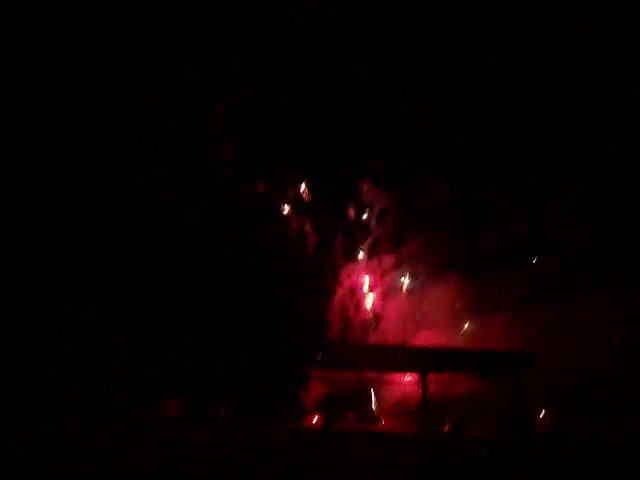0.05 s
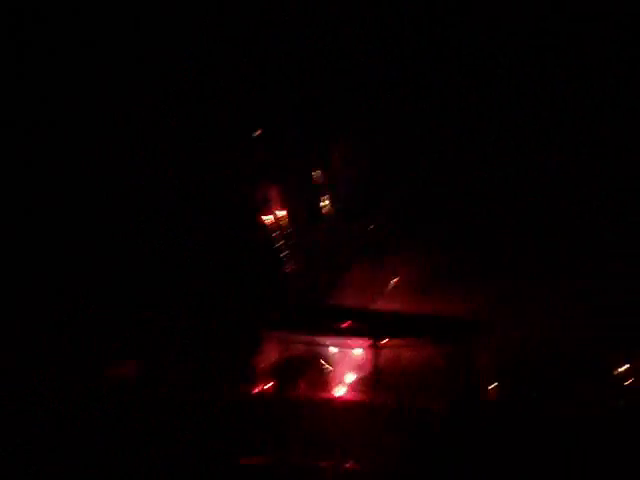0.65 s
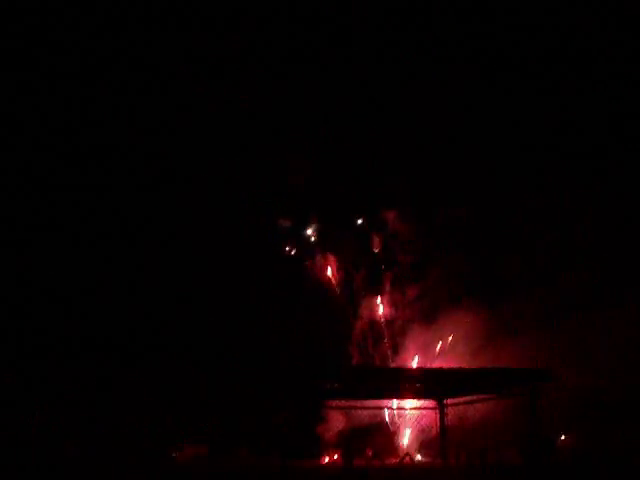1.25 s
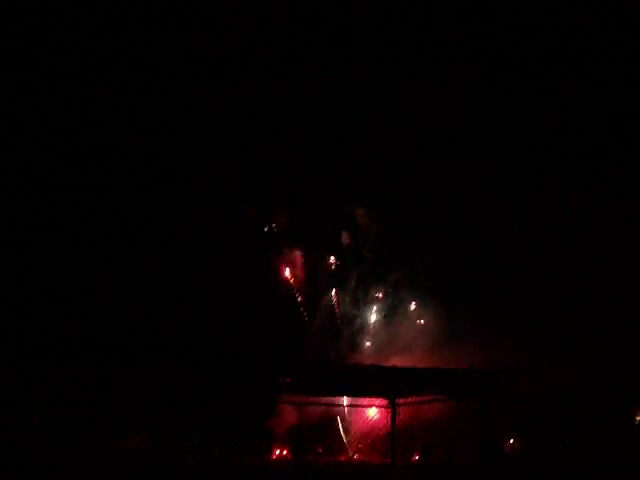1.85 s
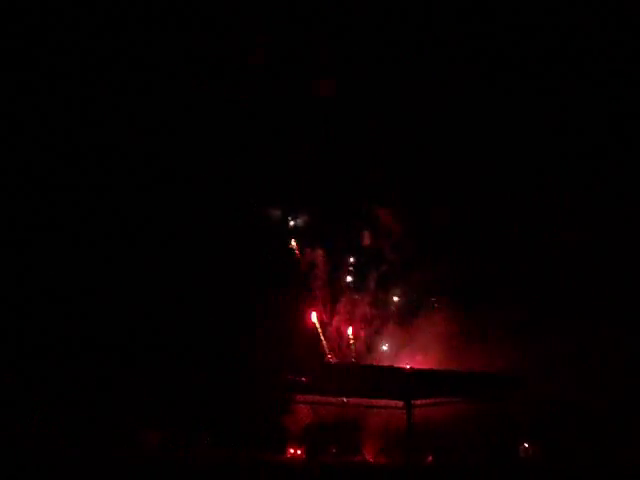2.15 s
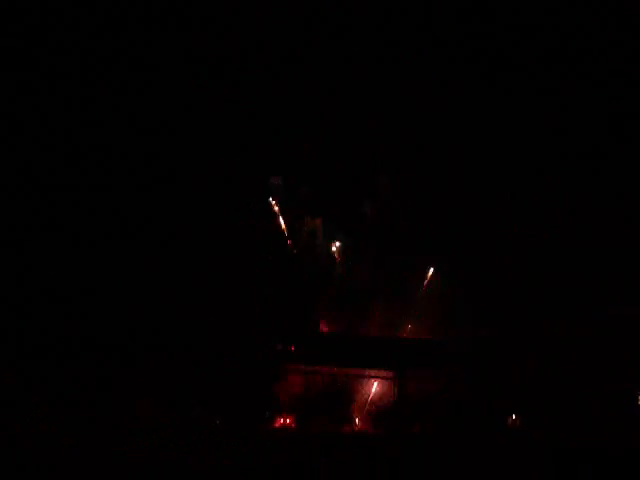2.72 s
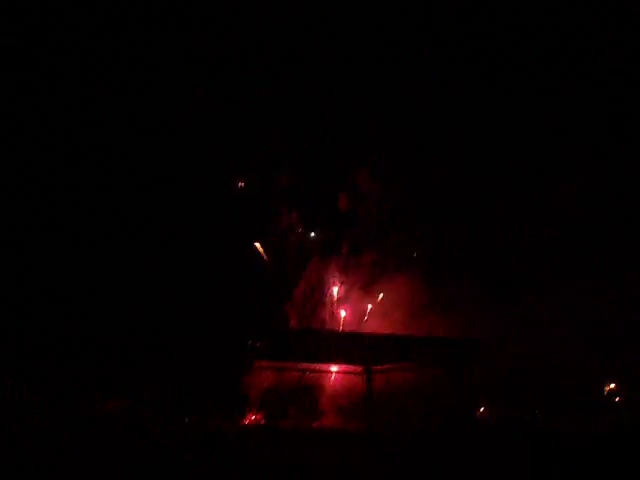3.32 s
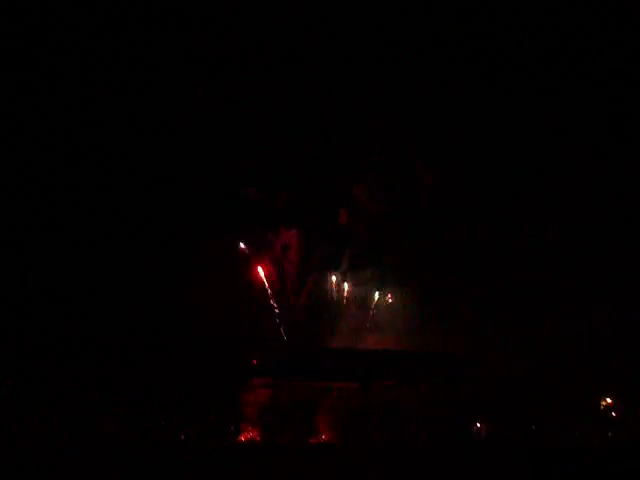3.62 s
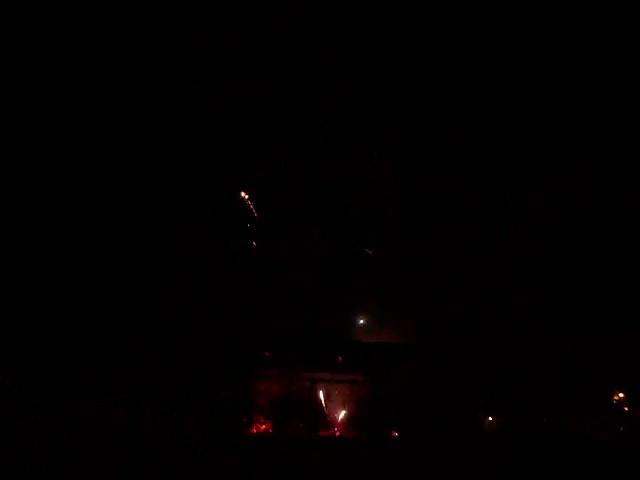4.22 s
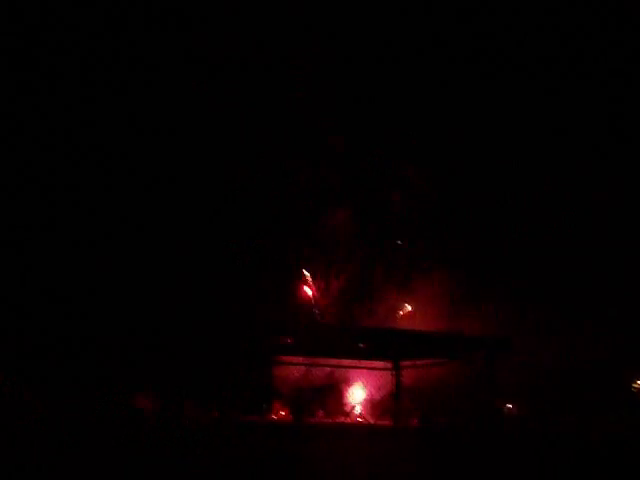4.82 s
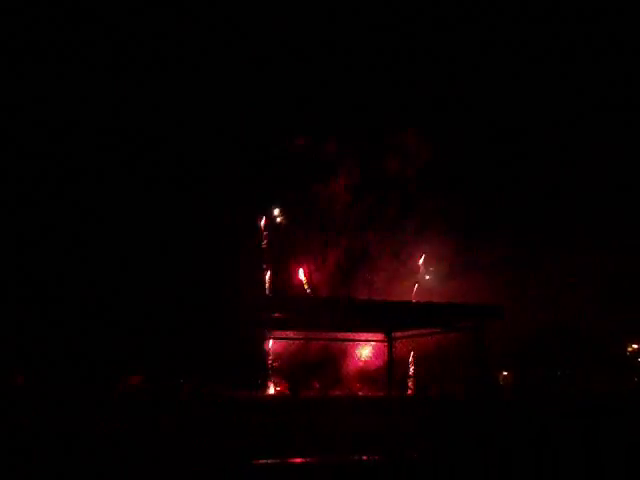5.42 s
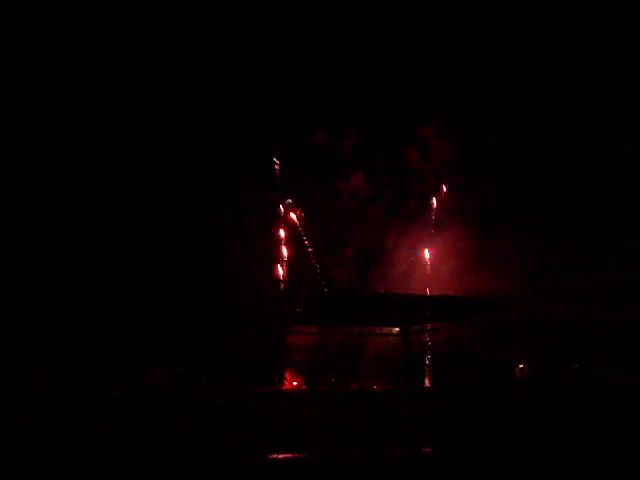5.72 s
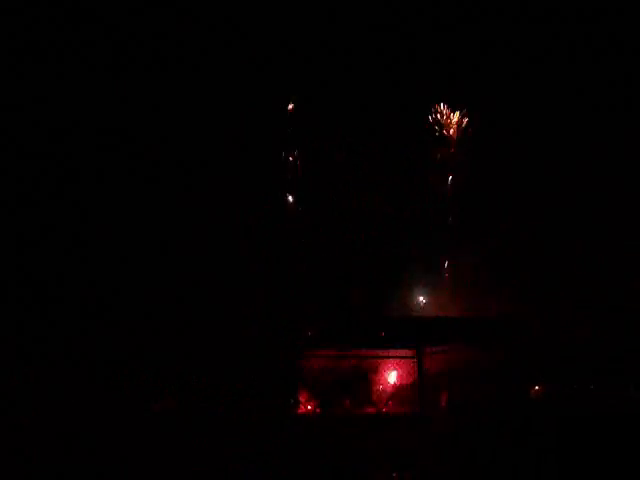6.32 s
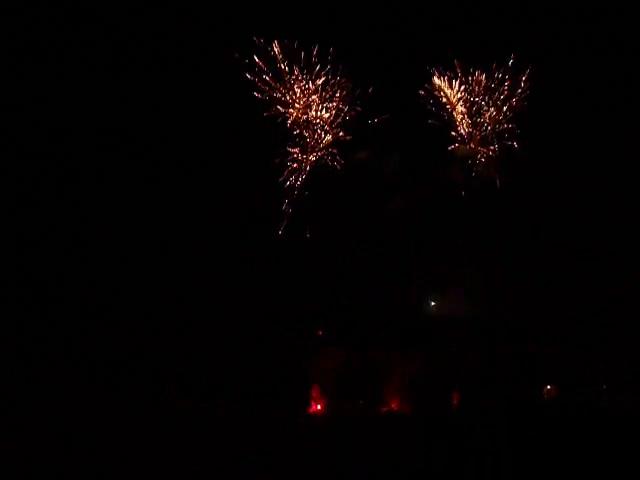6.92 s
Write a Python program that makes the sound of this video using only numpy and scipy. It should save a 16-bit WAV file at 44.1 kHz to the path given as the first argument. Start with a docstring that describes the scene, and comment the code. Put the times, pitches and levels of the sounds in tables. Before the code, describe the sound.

Ground fireworks crackle and pop continuously some way off outdoors, with a light echo over soft night noise. Faint gliding whistles sound between 0.3 and 1 second and again at 1.5 seconds. Close up, fingers rub the hand-held camera during the first second and a half, and wind buffets the microphone around 0.3 seconds, hardest at 1 second, and again at 2.5. A cluster of loud knocks on the camera follows from 2.6 to 2.8 seconds, then a few small thuds, the strongest near 3.4. A faint low hum returns about once a second from 1.2 seconds on. From 5.4 to 6.2 seconds, comets leave their tubes in a quick run of sharp cracks with light thumps. At about 6.7 seconds they burst in several loud bangs and dense crackling. The loudest moments overload the microphone.

```python
"""Ground fireworks at night

Some way off, stars (burning pellets) crackle without pause, and a few whistles sound among them.
Comets are shot from tubes with sharp cracks, then burst into dense crackling. Close by, a hand-held
camera is rubbed and knocked, air buffets its microphone, and a low hum comes about once a second.
The loudest moments overload the microphone."""
import sys
import numpy as np
from scipy import signal
from scipy.io import wavfile
from scipy.ndimage import uniform_filter1d

SR = 44100
rng = np.random.default_rng(int(sys.argv[2]) if len(sys.argv) > 2 else 0)


def dump(signal):
    """Clip the signal to [-1, 1] and save it as 16-bit WAV at the path in sys.argv[1]."""
    limited = np.clip(np.atleast_2d(signal).T, -1, 1)
    pcm = np.round(limited * 32767).astype(np.int16)
    wavfile.write(sys.argv[1], SR, pcm)


N = 306495
TIME = np.arange(N) / SR

# The tone of a sharp snap. Each row: frequency in Hz, relative level in dB.
SNAP_COLOUR = [(410, -54.5), (700, -18), (741, -22), (964, -8.5), (1250, -19.5), (1400, -12.5), (1590, -15),
               (2120, -2.5), (2560, -3.5), (3070, -1), (3420, -4), (3840, -1), (4990, -12.5), (6490, -40.5),
               (11000, -120)]
# How fiercely the stars burn. Each row: time in seconds, relative level of their crackle in dB.
FIERCENESS = [(0, -29.5), (.29, -23.5), (.84, -26), (1.42, -31.5), (1.68, -22.5), (2.62, -22.5),
              (2.83, -31), (3.36, -22.5), (3.9, -33.5), (4.3, -25), (4.55, -24.5), (5.3, -38.5), (5.5, -34),
              (5.62, -27.5), (5.88, -23.5), (6.45, -30.5), (6.95, -26)]


def amp(db):
    """Turns decibels into a number to multiply a sound by."""
    return 10 ** (np.asarray(db) / 20)


def unit(x):
    """Scales a signal so that its average strength (rms) is 1."""
    return x / np.sqrt(np.mean(x ** 2) + 1e-20)


def add(mix, s, sound):
    """Mixes a sound in, starting at s seconds."""
    part = mix[max(round(s * SR), 0):][:len(sound)]
    part += sound[:len(part)]


def colour(x, points, size=4096):
    """Shapes a sound's tone to follow (Hz, dB) points; white noise keeps its power."""
    hz, db = np.transpose(points)
    bin_hz = abs(np.fft.fftfreq(size, 1 / SR))
    curve_db = np.interp(np.log(bin_hz + 1), np.log(hz + 1), db)
    log_gain = np.log(amp(np.maximum(curve_db, -90)))
    response = np.exp(np.conj(signal.hilbert(log_gain)))  # rings after a click, never before it
    taps = np.fft.ifft(response).real[:size // 2]
    return signal.oaconvolve(x, taps / np.linalg.norm(taps))[:len(x)]


def snaps(count, per_s, spread_db):
    """Random clicks of uneven size, spread over count samples."""
    happens = rng.random(count) < per_s / SR
    size = np.minimum(rng.exponential(1, count), 4)
    sign = rng.choice([-1, 1], count)
    return unit(happens * sign * amp(spread_db * size))


def wobble(count, size):
    """A random drift; a larger size makes it slower."""
    return unit(uniform_filter1d(rng.standard_normal(count), size=size))


def swell(s, length, rise_s, fade_db_per_s):
    """A loudness curve that reaches 1 at s seconds, holds for the length, then fades."""
    rise = np.clip(1 + (TIME - s) / rise_s, 0, 1)
    return rise * amp(-fade_db_per_s * np.maximum(TIME - s - length, 0))


def field_echo(x, echo_db, fade_s):
    """Ground, shelter and trees scatter a sound, adding an echo that falls 60 dB in fade_s."""
    t = np.arange(SR) / SR
    reflections = snaps(SR, 2500, 4.5) * amp(-60 * t / fade_s) * (t > .012)
    tail = unit(reflections) / np.sqrt(SR)
    return x + amp(echo_db) * signal.fftconvolve(x, tail)[:N]


def night(level_db=-36):
    """The steady, soft noise of the outdoors."""
    # The tone of the background. Each row: frequency in Hz, relative level in dB.
    night_colour = [(29, -28.5), (50, -0.5), (153, -1), (727, -8.5), (934, -8), (1250, -8), (1400, -4.5),
                    (1660, -10), (2310, -1), (2910, -13.5), (3460, -5.5), (3810, -11), (4990, -14),
                    (6490, -37), (11000, -120)]
    return amp(level_db) * colour(rng.standard_normal(N), night_colour)


def hums(start_hz=163.5, sag=0.12, waver=0.069, tone_db=-7, rough_db=-2):
    """A low tone swells and sinks in pitch inside a rough drone."""
    # The hums. Each row: start in seconds, length in seconds, relative level in dB.
    hum_times = [(1.17, 0.26, -33), (2.21, 0.075, -32), (3.23, .24, -31.5), (4.26, .24, -31.5),
                 (5.18, 0.22, -32), (6.21, .24, -32.5)]
    # The tone of the drone. Each row: frequency in Hz, relative level in dB.
    drone_colour = [(50, -37.5), (100, -5.5), (135, 3.5), (180, -4), (240, -14.5), (400, -15), (900, -49.5)]
    out, drone = np.zeros(N), colour(rng.standard_normal(N), drone_colour)
    for s, length, db in hum_times:
        progress = np.linspace(0, 1, int(length * SR))
        count = len(progress)
        pitch = start_hz * (1 - sag * np.sqrt(progress) + waver * wobble(count, size=400))
        tone = amp(tone_db) * unit(np.sin(2 * np.pi * np.cumsum(pitch) / SR))
        rough = amp(rough_db) * unit(drone[round(s * SR):][:count])
        add(out, s, amp(db) * (tone + rough) * signal.windows.tukey(count, .3))
    return out


def wind(rumble_db=-5, flutter_db=-1):
    """Puffs jolt the microphone's thin skin, which creeps back; gusts rumble and flutter."""
    # Puffs of air. Each row: start in seconds, level in dB, push (+1) or pull (-1),
    # rise time in seconds, decay time in seconds.
    puffs = [(.2520, -1, 1, 0.0037, 0.0092), (0.294, -9, -1, 0.0039, 0.036),
             (0.345, -5.5, -1, 0.0024, 0.019), (0.376, -2, 1, 0.0071, 0.0021),
             (0.4056, -8.5, -1, 0.002, 0.023), (1.0332, 11, -1, 0.0011, 0.0031),
             (1.0379, 2.5, 1, 0.0009, 0.014), (1.0700, 3.5, -1, 0.0055, 0.0054),
             (1.0811, 3, 1, 0.0019, 0.024), (1.1130, -2.5, 1, 0.002, 0.012), (1.139, -12, -1, .025, 0.087),
             (1.7300, -17.5, 1, 0.0031, 0.0064), (2.464, -6.5, -1, 0.045, 0.0068),
             (2.513, 2, 1, 0.0013, 0.012), (2.9400, -16, 1, 0.017, 0.013), (3.0200, -17, -1, 0.021, 0.034)]
    # Gusts. Each row: arrival and length in seconds, relative levels of rumble and flutter in dB.
    gusts = [(0.261, 0.22, -19.5, -27.5), (1.021, 0.051, -19, -18), (1.72, 0.18, -23.5, -57),
             (2.198, 0.22, -26, -48), (2.424, .06, -20, -30), (2.496, 0.347, -32, -25.5),
             (2.955, 0.11, -23, -35), (4.15, 0.41, -29.5, -52), (4.623, 0.013, -23, -36),
             (5.1, 0.94, -31, -55)]
    # The tones of the rumble and of the swirling air. Each row: frequency in Hz, relative level in dB.
    rumble_colour = [(5, -1.5), (15, 0), (30, -8.5), (60, -17), (120, -27), (300, -54.5)]
    flutter_colour = [(20, 1.5), (60, -2.5), (150, 0.5), (280, -10), (500, -20.5), (1200, -46),
                      (3000, -92.5)]
    jolts, t = np.zeros(N), np.arange(SR // 2) / SR
    for s, db, direction, rise, decay in puffs:
        push = np.sin(np.pi / 2 * np.minimum(t / rise, 1)) ** 2
        creep_back = np.exp(-np.maximum(t - rise, 0) / decay)
        add(jolts, s, np.sign(direction) * amp(db) * push * creep_back)
    slow, quick = amp(-33), 0  # a breeze keeps rumbling between gusts
    for s, length, low_db, rough_db in gusts:
        slow = np.maximum(slow, amp(low_db) * swell(s, length, rise_s=.07, fade_db_per_s=24))
        quick = np.maximum(quick, amp(rough_db) * swell(s, length, rise_s=.02, fade_db_per_s=301))
    rumble = unit(colour(rng.standard_normal(N), rumble_colour + [(1000, -84)], size=16384))
    flutter = colour(rng.standard_normal(N), flutter_colour)
    return jolts + amp(flutter_db) * quick * flutter + amp(rumble_db) * slow * rumble


def knocks(detune=0.063, tick_db=-12, tick_s=0.0026):
    """Each knock ticks and makes the camera's case ring briefly, at slightly different pitches."""
    # Knocks on the camera. Each row: start in seconds, relative level in dB.
    blows = [(1.1750, -10), (2.5583, -8), (2.5847, -3.5), (2.611, 1.5), (2.639, 14), (2.641, 18.5),
             (2.6465, 1), (2.6847, 11.5), (2.6882, 6.5), (2.7561, 10.5), (2.7804, 10.5), (2.82, 9)]
    # The notes of the case. Each row: pitch in Hz, relative level in dB, seconds to fade by 60 dB.
    case_notes = [(64, -15.5, 0.048), (121.4, -22.5, 0.067), (177, -15, 0.06), (267.5, -10.5, 0.026),
                  (569, -8, 0.017), (947, -1.5, 0.022), (1112, 4.5, 0.01), (1396, 0, 0.0092),
                  (1365, -36.5, 0.18)]
    out, t = np.zeros(N), np.arange(SR // 4) / SR
    ring_s = np.array(case_notes)[:, 2]
    soft_start = 1 - np.exp(-t / 0.0006)
    for s, db in blows:
        # The shortest notes stray the most in pitch.
        tunings = 1 + detune * ring_s.min() / ring_s * rng.standard_normal(len(case_notes))
        ring = sum(amp(note_db - 60 * t / fade_s) * np.sin(2 * np.pi * hz * tuning * t)
                   for (hz, note_db, fade_s), tuning in zip(case_notes, tunings))
        tick = amp(tick_db) * np.exp(-t / tick_s) * colour(rng.standard_normal(len(t)), SNAP_COLOUR)
        add(out, s, amp(db) * (ring + tick) * soft_start)
    return out


def rubbing():
    """A finger sliding over the camera makes a stream of tiny slips."""
    # Finger strokes. Each row: arrival in seconds, length in seconds, level in dB.
    strokes = [(0.078, .042, -19), (0.183, 0.015, -20), (0.225, 0.025, -19), (0.625, 0.037, -28),
               (1.018, 0.094, -25), (1.181, 0.053, -22), (1.258, 0.084, -25), (2.499, .04, -25.5)]
    # The tone of the rubbing. Each row: frequency in Hz, relative level in dB.
    rub_colour = [(300, -19.5), (650, -16), (850, -4.5), (1050, 0.5), (1350, -7), (1900, -9.5), (2400, -10),
                  (4000, -44)]
    loudness = sum(amp(db) * swell(s, length, rise_s=0.022, fade_db_per_s=899)
                   for s, length, db in strokes)
    return loudness * colour(snaps(N, 3000, 3.3), rub_colour + [(6000, -66)])


def thuds(cycles=17, soft_s=0.0008, low_share=0.11):
    """Small dull thuds: a note that starts softly and dies fast, over a weaker one an octave below."""
    # The thuds. Each row: start in seconds, relative level in dB, pitch in Hz.
    hits = [(.4500, -17, 504), (2.0730, -18.5, 573), (3.1267, -12, 1130), (3.174, -14, 1020),
            (3.3673, 3, 1174)]
    out, t = np.zeros(N), np.arange(4000) / SR
    for s, db, hz in hits:
        ring = np.sin(2 * np.pi * hz * t) + low_share * np.sin(np.pi * hz * t)
        add(out, s, amp(db - 60 * t * hz / cycles) * (1 - np.exp(-t / soft_s)) * ring)
    return out


def whistles(arch=.012, waver=0.013, flutter=0.5, gain_db=-2):
    """A whistling star sounds three gliding tones, each fluttering in level."""
    # The whistles. Each row: start and length in seconds, base pitch in Hz, glide as a share of
    # that pitch, relative level in dB, change to the side tones' level in dB.
    glides = [(0.336, 0.074, 825, 0.042, -26, -33), (.39, 0.26, 664, -0.038, -28.5, -14),
              (0.702, .25, 667, -0.059, -27, -6), (1.492, .14, 760, 0.049, -29, -24)]
    # Tones either side of the main one. Each row: multiple of the base pitch, relative level in dB.
    side_tones = [(2, 2), (4, -4)]
    out = np.zeros(N)
    for s, length, hz, glide, db, side_db in glides:
        progress = np.linspace(0, 1, int(length * SR))
        count = len(progress)
        bend = glide * progress + arch * np.sin(np.pi * progress)
        pitch = hz * (1 + bend + waver * wobble(count, size=250))
        phase = 2 * np.pi * np.cumsum(pitch) / SR
        # The main tone is at three times the base pitch.
        tones = [(3, 0)] + [(multiple, tone_db + side_db) for multiple, tone_db in side_tones]
        whistle = sum(amp(tone_db) * (1 + flutter * wobble(count, size=500)) * np.sin(multiple * phase)
                      for multiple, tone_db in tones)
        add(out, s, unit(whistle) * amp(gain_db + db) * signal.windows.tukey(count, .5))
    return out


def fizz(gain_db=-2, volleys_per_s=110, fade_s=0.0055, steady=0.68):
    """Burning stars give off countless small snaps, in volleys that start suddenly and fade."""
    starts = (rng.random(N) < volleys_per_s / SR) * rng.uniform(0.08, 1, N)
    volleys = unit(signal.lfilter([1], [1, -np.exp(-1 / (fade_s * SR))], starts))
    crackle = unit(snaps(N, 4000, 3.3) * (steady + volleys))
    fire_db = np.interp(TIME, *np.transpose(FIERCENESS))
    return amp(gain_db + fire_db) * colour(crackle, SNAP_COLOUR)


def lesser_stars(count=400, per_s=26, lift_db=1.5, spread_db=2, shortest_s=.0015, longest_s=.012):
    """Lists random small pops as (start, dB, length); a fiercer fire makes them louder."""
    gap, size, span = rng.random((count, 3)).T
    starts = np.cumsum(2 * gap / per_s)
    lengths = shortest_s * (longest_s / shortest_s) ** span
    db = np.interp(starts, *np.transpose(FIERCENESS)) + lift_db + spread_db * (2 * size - 1)
    db -= 6 * np.log10(lengths / np.sqrt(shortest_s * longest_s))  # short pops are sharper
    return [row for row in zip(starts, db, lengths) if row[0] < N / SR]


def star_pops(first_snap=0.77, fall_db=7, snaps_per_s=2200, ceiling=0.64):
    """Each star goes off with one sharp snap and a volley of smaller ones."""
    # The loudest stars. Each row: start in seconds, level in dB, length in seconds.
    loud_stars = [(.2, -15, 0.0032), (.279, -21, 0.0029), (.375, -18, .0037), (.4491, -10.5, 0.0016),
                  (.5834, -18.5, .0063), (.702, -24, .015), (.9483, -17.5, 0.0036), (.9707, -17.5, 0.0024),
                  (.987, -11.5, 0.0026), (1.4774, -17.5, 0.0071), (1.514, -19, 0.0039),
                  (1.589, -19, 0.0087), (1.6206, -19, 0.01), (1.734, -18, .008), (1.793, -22, .012),
                  (1.829, -17.5, .0054), (1.874, -14.5, 0.0072), (1.9183, -8, 0.0027),
                  (2.01, -17.5, 0.0026), (2.0496, -14, 0.0054), (2.245, -16.5, 0.018), (2.326, -16, .005),
                  (2.4607, -19, 0.016), (2.54, -16, 0.0038), (2.663, -16, .0068), (2.9645, -16.9, 0.0074),
                  (3.1587, -17.5, 0.011), (3.3275, -17, 0.0081), (3.436, -19, 0.0068),
                  (3.533, -10.5, 0.0031), (3.602, -15.5, 0.004), (3.6282, -18, 0.0063),
                  (3.6408, -11, 0.0053), (3.6922, -22, .0039), (3.8115, -25, 0.0096), (3.8537, -15, 0.0033),
                  (3.9769, -20, .0084), (4.0339, -22, 0.0063), (4.0978, -22.5, 0.0075),
                  (4.1196, -21, 0.0093), (4.151, -19, .0034), (4.2282, -26, 0.0027), (4.2945, -13, 0.003),
                  (4.3166, -17, 0.0048), (4.341, -18.5, 0.012), (4.3874, -19.5, 0.011),
                  (4.4136, -12.5, 0.0052), (4.4468, -15, 0.005), (4.6055, -20, .006), (4.664, -21.5, 0.021),
                  (4.8507, -9.5, .0019), (4.8846, -17, .0017), (5.058, -18, 0.003), (5.233, -21, 0.0032),
                  (5.557, -11, 0.0039), (5.59, -19, 0.0066), (5.7091, -17, .015), (6.0744, -18, 0.0087),
                  (6.622, -15, 0.0019), (6.667, -26, .006), (6.768, -16, 0.011)]
    out = np.zeros(N)
    for s, db, length in loud_stars + lesser_stars():
        count = max(int(length * SR), 60)
        volley = snaps(count, snaps_per_s, 3.4) + 0.13 * rng.standard_normal(count)
        volley = unit(volley * amp(-fall_db * np.arange(count) / count))
        volley[0] += first_snap * np.sqrt(count)
        pop = colour(np.r_[volley, np.zeros(256)], SNAP_COLOUR, size=1024)
        add(out, s, amp(db) * np.sqrt(count) * pop / np.linalg.norm(pop))
    return ceiling * np.tanh(out / ceiling)  # the loudest snaps are softly flattened


def comet_shots(crack_s=0.0026, width_hz=700, floor_db=-24, ring_db=-6, tube_hz=209, peak_s=0.0021):
    """A launch charge cracks, its tube rings and thumps, and a nearby surface repeats the crack."""
    # Comets leaving their tubes. Each row: start in seconds, crack level in dB, crack pitch in Hz,
    # thump level in dB, echo level against the crack in dB, echo delay in seconds.
    launches = [(4.17, -26, 3020, -20.5, -8, .0065), (4.198, -33, 2980, -19, -1, 0.0072),
                (4.6290, -25, 3000, -21.5, -5, 0.0055), (5.4197, -6, 3010, -14.5, -2, 0.0053),
                (5.5470, -7, 3250, -13.5, 0.5, 0.0041), (5.638, -2, 2950, -15, -11, 0.0051),
                (5.6882, -3, 2670, -12, -13, 0.0058), (5.814, -3.5, 3220, -14, -8.5, 0.0075),
                (5.877, -3, 2920, -12.5, -19, 0.0036), (5.9339, 0.5, 3200, -11.5, -17, 0.0073),
                (6.0126, -8.5, 2720, -14, -7.5, 0.0063), (6.168, -13.5, 3000, -18.5, -1, 0.0073)]
    cracks, tubes, t = np.zeros(N), np.zeros(N), np.arange(2048) / SR
    hz = np.geomspace(400, 6000, num=24)
    fade = np.exp(-(t / crack_s) ** 2) + 0.18 * np.exp(-t / 0.015)
    thump_shape = (t / peak_s) ** 2 * np.exp(2 - 2 * t / peak_s)
    thump = thump_shape * (np.sin(2 * np.pi * tube_hz * t) - .2)  # a hollow note plus a push of gas
    for s, db, centre_hz, thump_db, echo_db, delay in launches:
        hump = np.exp(-.5 * ((hz - centre_hz) / width_hz) ** 2) + amp(floor_db)
        noise = colour(rng.standard_normal(len(t)) * fade, np.c_[hz, 20 * np.log10(hump)])
        crack = unit(noise) * np.sqrt(np.mean(fade ** 2))
        ring = amp(ring_db) * fade * np.sin(2 * np.pi * centre_hz * t)
        for late, change_db in ((0, 0), (delay, echo_db)):
            add(cracks, s + late, amp(db + change_db) * crack)
            add(tubes, s + late, amp(db + change_db) * ring)
        add(tubes, s, amp(thump_db) * thump)
    return cracks, tubes


def comet_bursts(rise_s=0.0092, hold_s=0.076, sag_db_per_s=35):
    """A charge bangs overhead, then its shower of sparks crackles, weakens and dies away."""
    # The bursts. Each row: start in seconds, bang level in dB, decay in seconds, spark level in dB.
    charges = [(6.6903, 8, 0.0037, -13.5), (6.8497, 5, 0.0065, -11), (6.889, 8.5, 0.0048, -9.5),
               (6.918, 1.5, 0.0068, -17)]
    # The tones of the bang and of the sparks. Each row: frequency in Hz, relative level in dB.
    bang_colour = [(59, -28), (100, -15), (183, -29), (258, -6), (382, -14), (539, -10.5), (635, -18.5),
                   (1000, 3.5), (1260, -20), (1750, -10), (2060, -5.5), (2640, -5.5), (3100, -4),
                   (3840, -7.5), (4990, -18.5), (6490, -27), (11000, -120)]
    spark_colour = [(120, -57), (200, -20), (672, -14), (992, -7.5), (1510, 0.5), (1770, -7), (2140, 1.5),
                    (2650, -4), (3710, 0), (4420, -11), (4990, -9.5), (6490, -50), (11000, -120)]
    bangs, spark_power, t = np.zeros(N), np.zeros(N), np.arange(3000) / SR
    for s, db, decay, sparks_db in charges:
        add(bangs, s, amp(db) * np.exp(-t / decay) * rng.standard_normal(len(t)))
        shower = swell(s + rise_s, hold_s, rise_s, fade_db_per_s=249)
        spark_power += (shower * amp(sparks_db - sag_db_per_s * np.maximum(TIME - s, 0))) ** 2
    sparks = np.sqrt(spark_power) * colour(snaps(N, 4000, 3.1), spark_colour)
    return colour(bangs, bang_colour) + sparks


def scene():
    """Mixes the fireworks across the field with the small sounds nearby, in one channel."""
    cracks, tubes = comet_shots()
    stars = field_echo(star_pops() + fizz() + whistles(), echo_db=-13.5, fade_s=0.71)
    shots = field_echo(cracks, echo_db=-8, fade_s=0.99) + tubes
    fireworks = stars + shots + comet_bursts()
    return (fireworks + thuds() + knocks() + rubbing() + wind() + hums() + night())[None]


def record(dry, muffle_hz=5250, top_hz=16000):
    """The microphone overloads and loses treble; loud peaks are flattened again and spit it back."""
    def low_pass(x, hz):
        taps = signal.firwin(255, hz, window=("kaiser", 8), fs=SR)
        return signal.oaconvolve(x, taps[None], "same")
    muffled = low_pass(np.clip(dry, -1.15, 1.15), muffle_hz)
    return low_pass(np.clip(muffled, -1, 1), top_hz)


dry = scene()
out = record(dry)
dump(out)
```